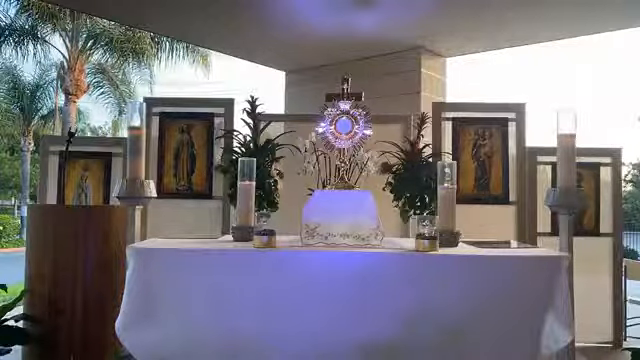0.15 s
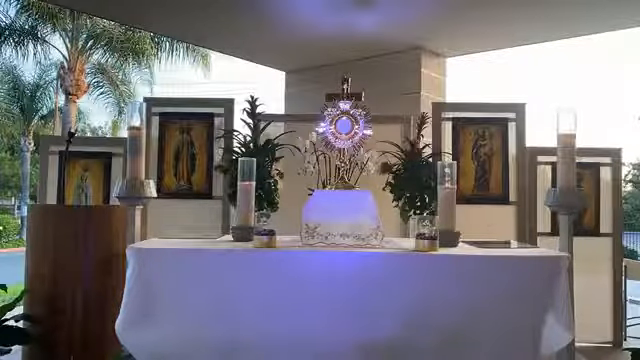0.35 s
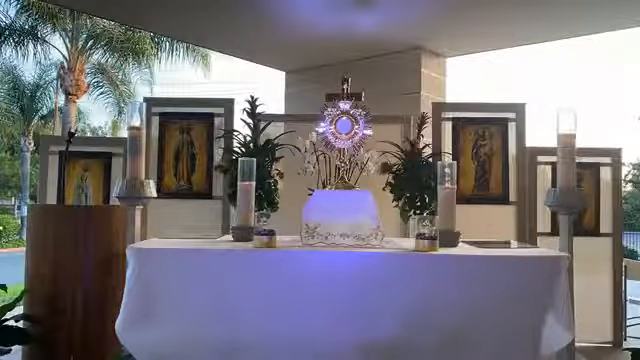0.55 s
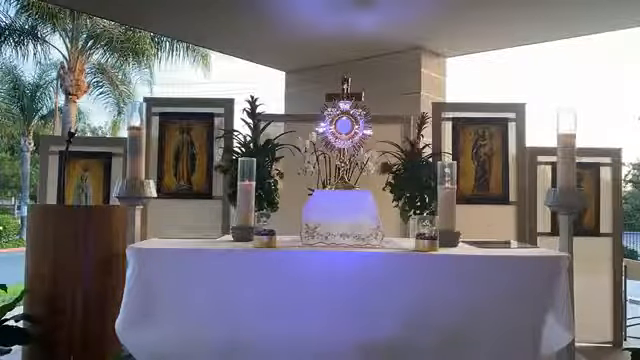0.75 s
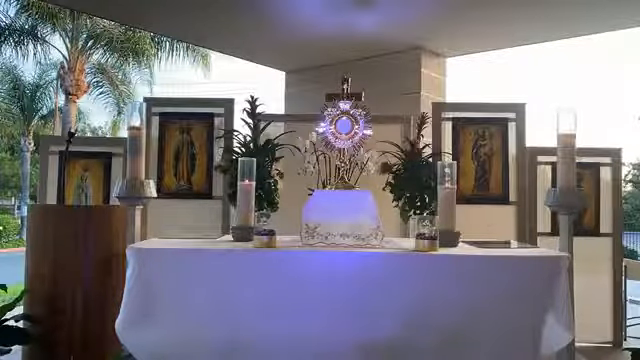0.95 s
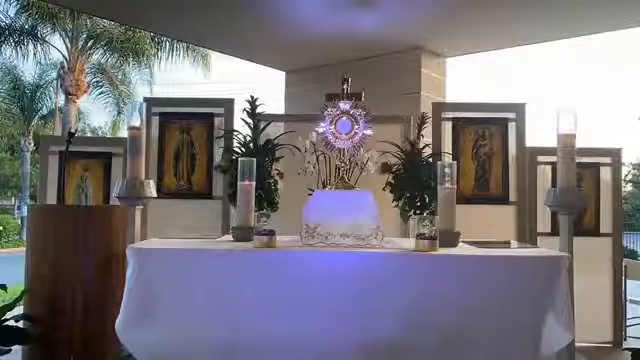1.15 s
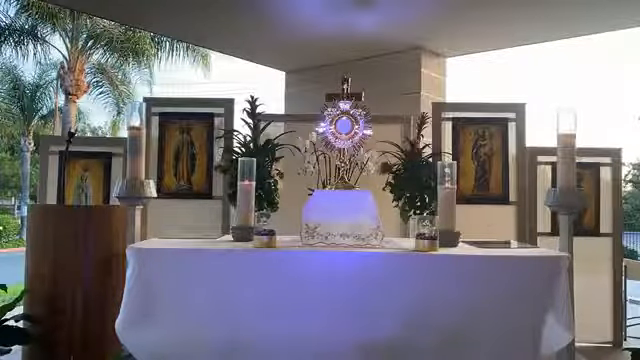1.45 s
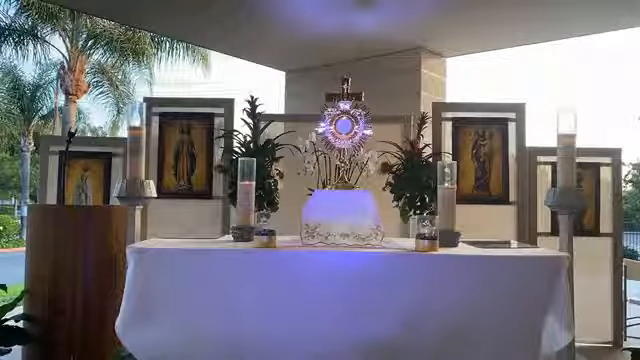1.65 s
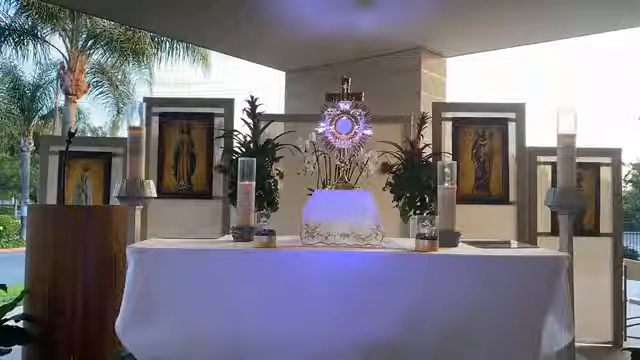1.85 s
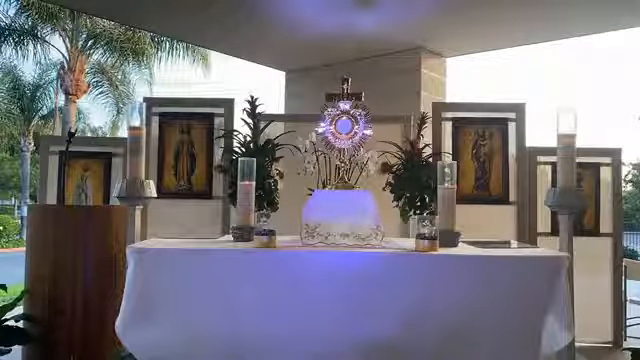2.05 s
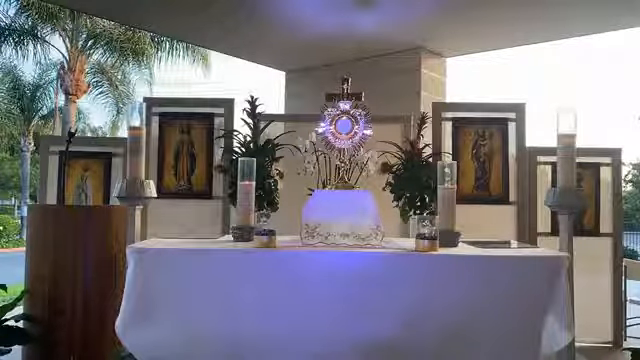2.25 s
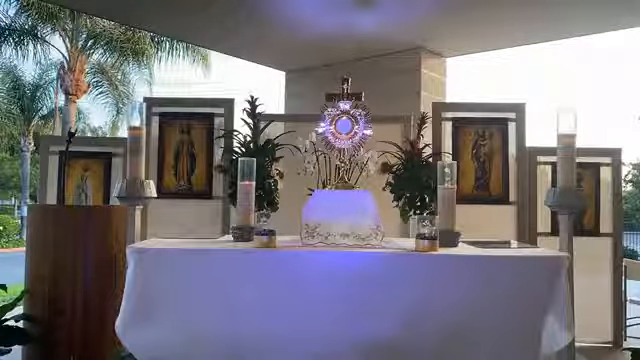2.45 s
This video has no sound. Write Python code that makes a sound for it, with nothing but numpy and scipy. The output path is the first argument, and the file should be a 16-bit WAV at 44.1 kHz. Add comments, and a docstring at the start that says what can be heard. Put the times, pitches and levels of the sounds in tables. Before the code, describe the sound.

Distant road traffic hissing steadily over a faint low hum, with light wind nudging the microphone

```python
"""Distant road traffic heard from a covered outdoor space, about 2.6 seconds long.
From start to end: a smooth hiss of tyres (shaped noise) over a low hum of mains and distant machinery
(wavering sines). A light gust presses on the microphone as a slow sub-bass sway (even-swinging low
noise), building after half a second. Just past 1.4 s comes one sharp buffet (a bell-shaped push), as the
gust nears its peak; a weaker swell follows at 1.84 s and the gust has almost died away by the end."""
import sys
import numpy as np
from scipy import signal
from scipy.fft import rfft, irfft, next_fast_len
from scipy.io import wavfile

SR = 44100
rng = np.random.default_rng(int(sys.argv[2]) if len(sys.argv) > 2 else 0)


def unload_wav(signal):
    """Save mono or channel-first audio to the path in sys.argv[1] as 16-bit WAV at rate SR, clipped to [-1, 1]."""
    wavfile.write(
        sys.argv[1],
        SR,
        np.round(np.clip(np.atleast_2d(signal).T, -1, 1) * 32767).astype(np.int16),
    )


N = 114660  # length in samples

# Tone colour of the tyre and road roar. Each row: frequency in Hz, relative level in dB per Hz.
ROAR_SPECTRUM = [(20, -10), (32, -10), (45, -5), (54, -5.5), (79, -3), (107, -6.5), (150, -8), (175, -6.5),
                 (205, -4), (245, -6.5), (287, -8.5), (343, -9.5), (426, -13.5), (560, -9.5), (725, -9),
                 (848, -12), (1030, -10), (1310, -13.5), (1440, -11.5), (2200, -13.5), (3200, -15),
                 (3700, -14.5), (4400, -15.5), (4800, -20.5), (5300, -24.5), (6200, -27.5), (7000, -32.5),
                 (8000, -35.5), (9800, -40), (10800, -45.5), (12400, -49), (16000, -53)]
# Loudness of the whole roar. Each row: time in seconds, rms level in dB.
ROAR_LEVEL = [(0, -52.5), (1.3, -52.5), (2.6, -52.5)]
# Tones in the hum. Each row: start pitch in Hz, end pitch in Hz, width of the waver in Hz,
# steady share of the power from 0 to 1.
HUM_TONES = [(92.5, 95.5, 4, .6), (120, 120, 2, .85), (184.8, 184.4, 3, .9), (223.8, 223.2, 4, .6),
             (240.2, 240.2, 2, .92), (255.8, 256.2, 2, .92), (345.5, 350, 4, .6), (395, 391.5, 5, .4),
             (480.4, 480.4, 3, .5), (620, 630, 30, .1), (706.5, 715.5, 8, .65)]
# Loudness of each hum tone, in the same order. Each row: level in dB at five evenly spaced moments.
HUM_LEVELS = [(-68, -74, -72, -68.5, -70.5), (-64.5, -70.5, -72, -70, -81), (-70, -69.5, -64.5, -61.5, -60),
              (-75, -76, -71.5, -71, -71), (-62, -61.5, -65, -66.5, -61), (-61.5, -62.5, -64.5, -70, -60.5),
              (-71, -70.5, -72.5, -76, -70), (-78, -74, -78, -76, -71), (-81, -76.5, -76.5, -80.5, -81),
              (-70.5, -71.5, -71.5, -68.5, -73), (-69.5, -69.5, -65.5, -69, -73)]
# Strength of the gust on the microphone. Each row: time in seconds, rms level of the sway in dB.
GUST = [(0, -42.5), (.4, -49), (.66, -34), (.9, -39), (1.2, -38), (1.4, -41), (1.49, -24), (1.6, -31.5),
        (1.7, -43), (1.84, -32), (2.05, -40), (2.25, -41), (2.6, -57.5)]

ROAR_PATCHY_DB, ROAR_PATCH_HZ = 0.26, 18  # rms depth and top speed of the swelling in each band
GUST_LOW_HZ, GUST_HIGH_HZ = 2.16, 7.56  # edges of the sway
SWAY_EVENNESS = 0.78  # 0 free noise, 1 swings of nearly equal height
GUST_TAIL_HZ, GUST_TAIL_DB = 15, -14  # top of the faster flutter, its level under the sway at the gust's peak
BUFFET_S, BUFFET_DB, BUFFET_WIDTH_S = 1.425, -26, .017  # centre, peak level, standard deviation
FADE_IN_S, CUTOFF_HZ = .002, 15700


def amp(db):
    """Decibels to gain."""
    return 10 ** (np.asarray(db) / 20)


def rms_one(x):
    """Scale to rms 1."""
    return x / np.sqrt(np.mean(x ** 2) + 1e-30)


def in_time(rows):
    """A table of times and values, read at every sample."""
    seconds, value = np.transpose(rows)
    return np.interp(np.arange(N) / SR, seconds, value)


def coloured(gain_at):
    """White noise shaped by the gain curve gain_at(hz)."""
    size = next_fast_len(N)
    hz = np.maximum(np.arange(size // 2 + 1) * SR / size, .1)  # keeps 1 / hz finite
    return irfft(rfft(rng.standard_normal(size)) * gain_at(hz), size)[:N]


def low_pass(hz, corner_hz, order):
    """Gain of a smooth low-pass; fed with 1 / hz and 1 / corner it becomes a high-pass."""
    return 1 / np.sqrt(1 + (hz / corner_hz) ** (2 * order))


def roar():
    """Tyre and road noise: overlapping octave-spaced bands, each swelling slightly on its own."""
    table_hz, table_db = np.transpose(ROAR_SPECTRUM)
    total = 0
    for centre in 32 * 2. ** np.arange(10):
        def band_gain(hz):
            """Roar spectrum seen through a window reaching one octave either side of the centre."""
            octaves_away = np.clip(np.log2(hz / centre), -1, 1)
            colour = amp(np.interp(np.log(hz), np.log(table_hz), table_db))
            return colour * np.cos(np.pi / 2 * octaves_away)

        band = coloured(band_gain)
        swell = rms_one(coloured(lambda hz: low_pass(hz, ROAR_PATCH_HZ, order=2)))
        total = total + band * amp(ROAR_PATCHY_DB * swell)
    return amp(in_time(ROAR_LEVEL)) * rms_one(total)


def hum():
    """Low hum: sines, some gliding, each blended with a narrow band of noise that makes it waver."""
    t = np.arange(N) / SR
    total = 0
    for (start_hz, end_hz, width_hz, steady), levels_db in zip(HUM_TONES, HUM_LEVELS):
        glide = (end_hz - start_hz) * t ** 2 / (2 * t[-1])
        turns = start_hz * t + glide + rng.random()  # phase in cycles, random start
        waver_x, waver_y = [rms_one(coloured(lambda hz: low_pass(hz, width_hz / 2, order=2)))
                            for _ in "xy"]
        # a fixed carrier plus one that wanders in both strength and phase
        carrier = np.sqrt(2 * steady) + np.sqrt(1 - steady) * (waver_x + 1j * waver_y)
        tone = (carrier * np.exp(2j * np.pi * turns)).real
        level_db = np.interp(t, np.linspace(0, t[-1], len(levels_db)), levels_db)
        total = total + amp(level_db) * tone
    return total


def wind():
    """Gust pressure on the microphone: a slow sway, with faster flutter that rises more steeply."""
    gust_db = in_time(GUST)
    sway = rms_one(coloured(lambda hz: low_pass(hz, GUST_HIGH_HZ, order=3)
                            * low_pass(1 / hz, 1 / GUST_LOW_HZ, order=1)))
    # dividing by the envelope evens out the swings
    envelope = np.abs(signal.hilbert(sway))
    sway = sway / (envelope + 0.15) ** SWAY_EVENNESS
    smoother = signal.butter(2, 2 * GUST_HIGH_HZ, fs=SR, output="sos")
    sway = rms_one(signal.sosfiltfilt(smoother, sway))
    flutter = rms_one(coloured(lambda hz: low_pass(hz, GUST_TAIL_HZ, order=3)
                               * low_pass(1 / hz, 1 / GUST_HIGH_HZ, order=1)))
    # 1.3 dB of flutter for each dB of gust
    flutter_db = GUST_TAIL_DB + 1.3 * gust_db - .3 * gust_db.max()
    return amp(gust_db) * sway + amp(flutter_db) * flutter


def buffet():
    """One sharp push of air: a short bell-shaped pulse of pressure."""
    widths_away = (np.arange(N) / SR - BUFFET_S) / BUFFET_WIDTH_S
    return amp(BUFFET_DB) * np.exp(-.5 * widths_away ** 2)


def scene():
    """Roar, hum, wind and buffet summed at one microphone."""
    return (roar() + hum() + wind() + buffet())[None]


def record(dry):
    """A very short fade-in, then a steep cut of the extreme treble."""
    fade = np.sin(np.pi / 2 * np.minimum(np.arange(N) / SR / FADE_IN_S, 1)) ** 2
    treble_cut = signal.ellip(12, .5, 60, CUTOFF_HZ, fs=SR, output="sos")  # .5 dB ripple, 60 dB down
    return signal.sosfilt(treble_cut, dry * fade)


dry = scene()
out = record(dry)
unload_wav(out)
```